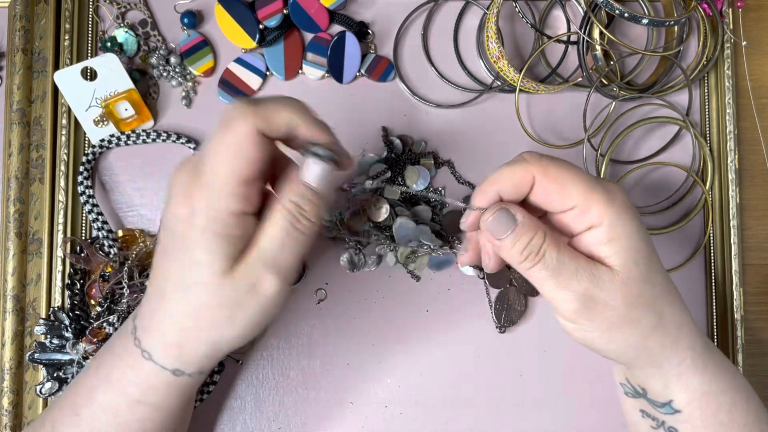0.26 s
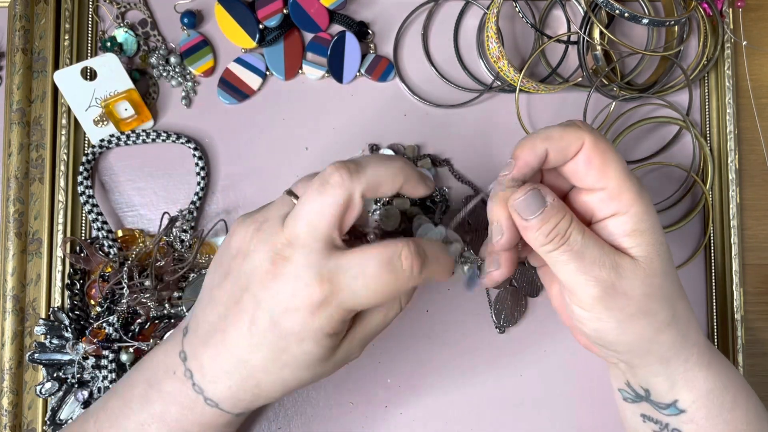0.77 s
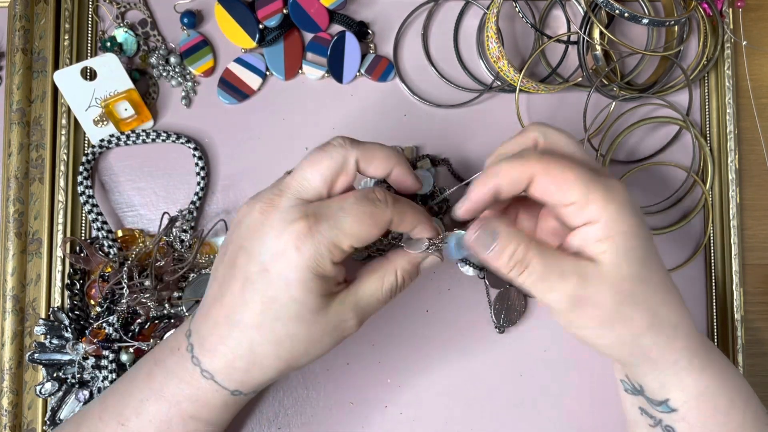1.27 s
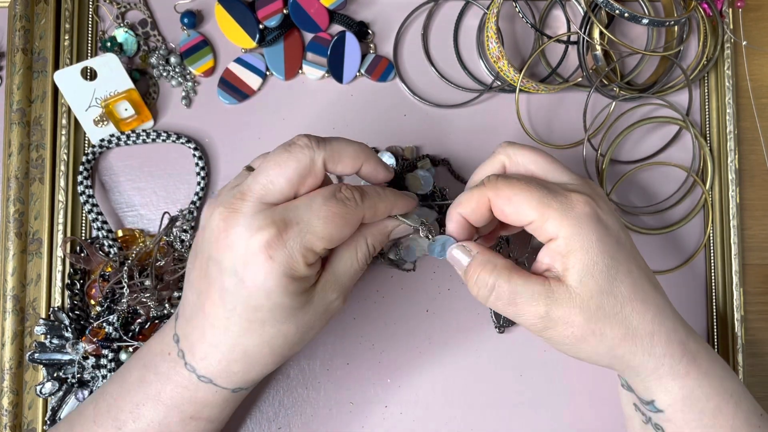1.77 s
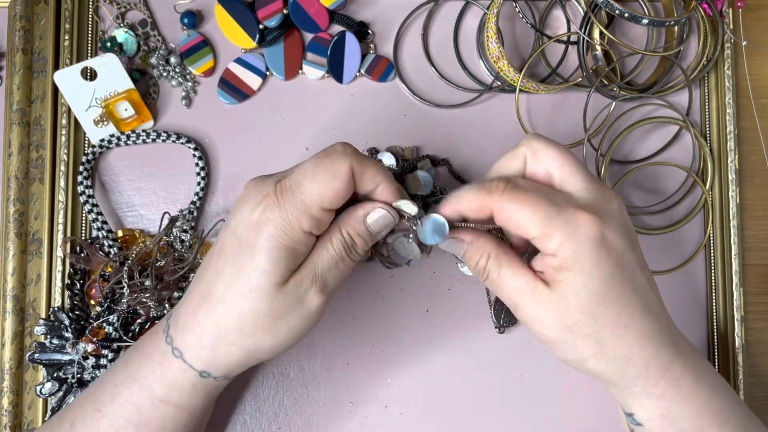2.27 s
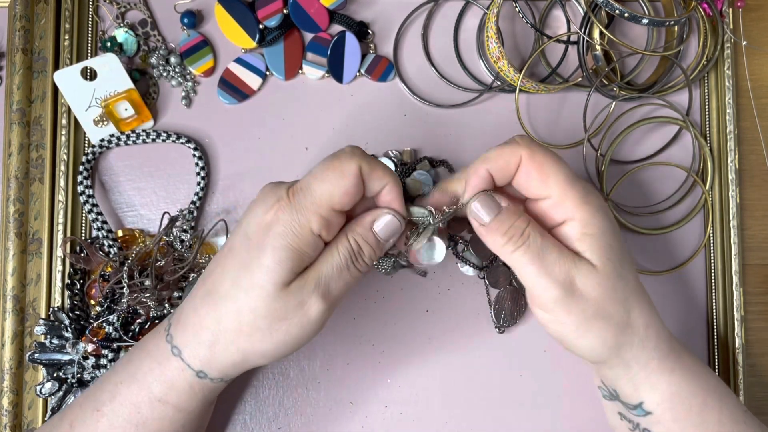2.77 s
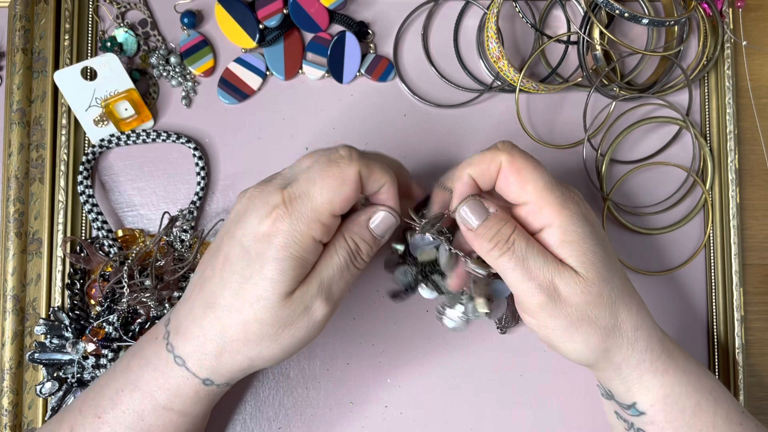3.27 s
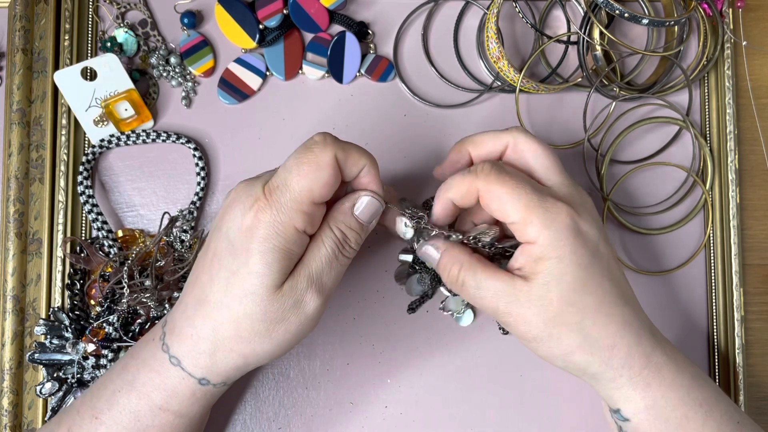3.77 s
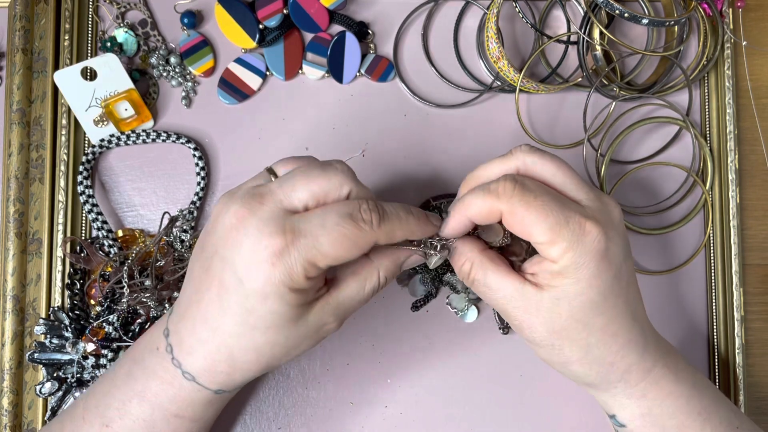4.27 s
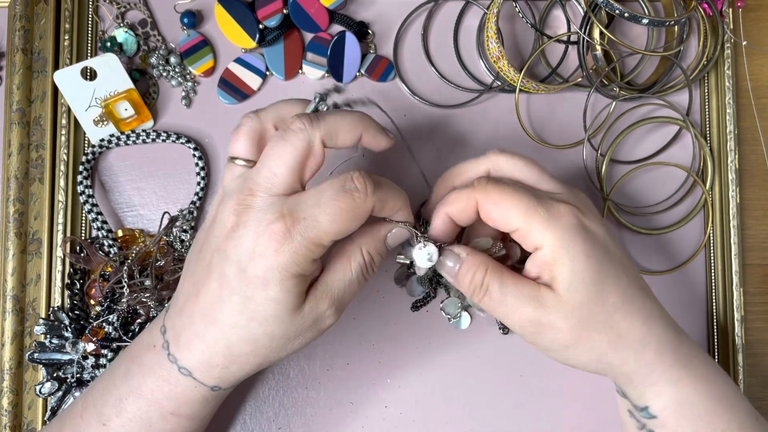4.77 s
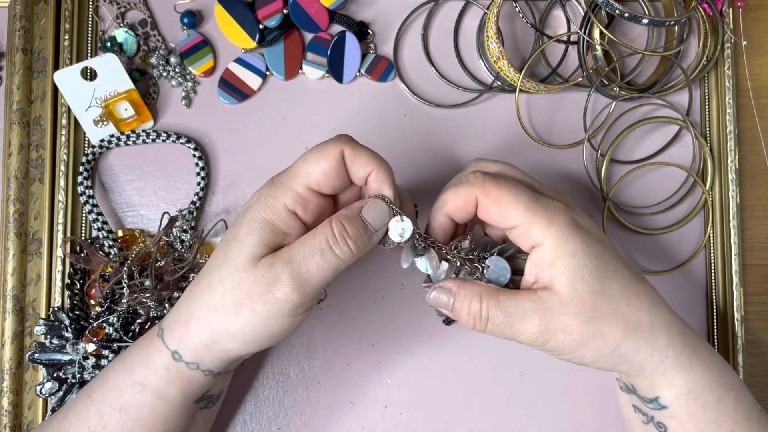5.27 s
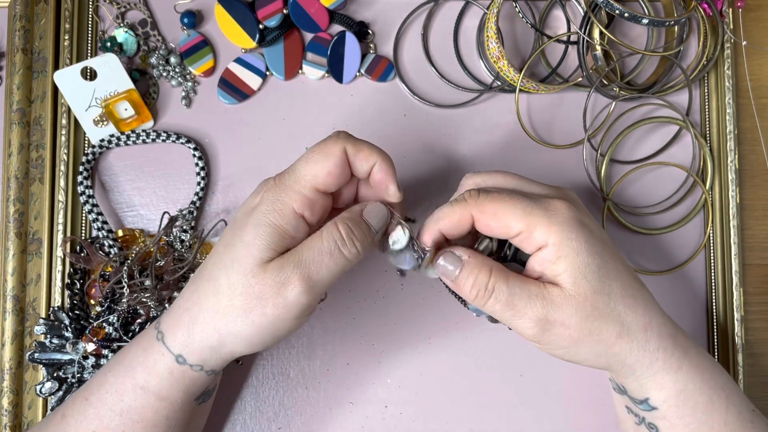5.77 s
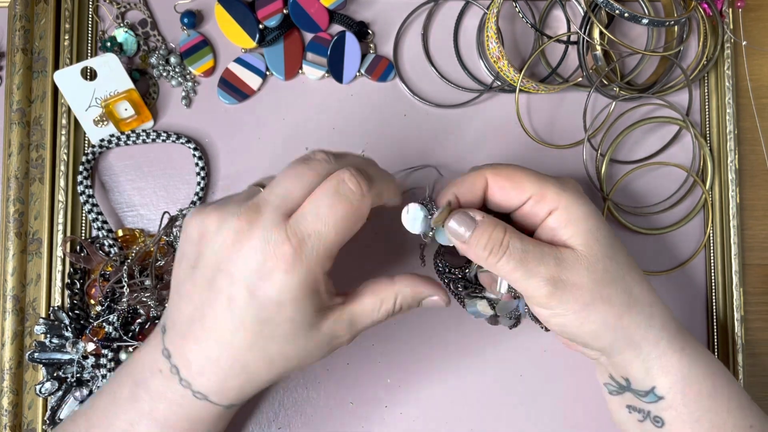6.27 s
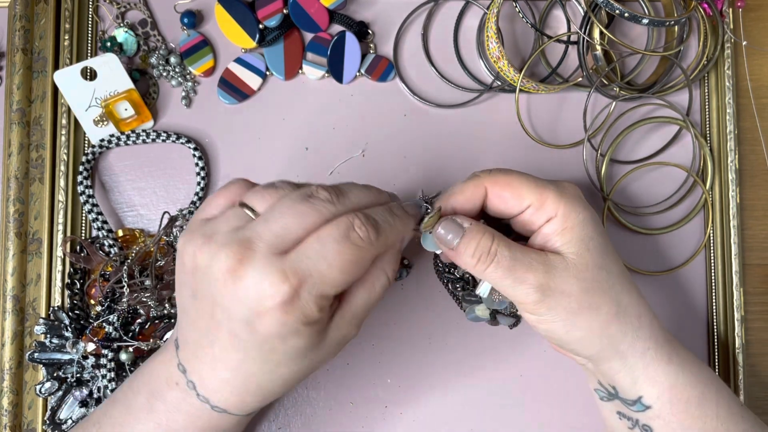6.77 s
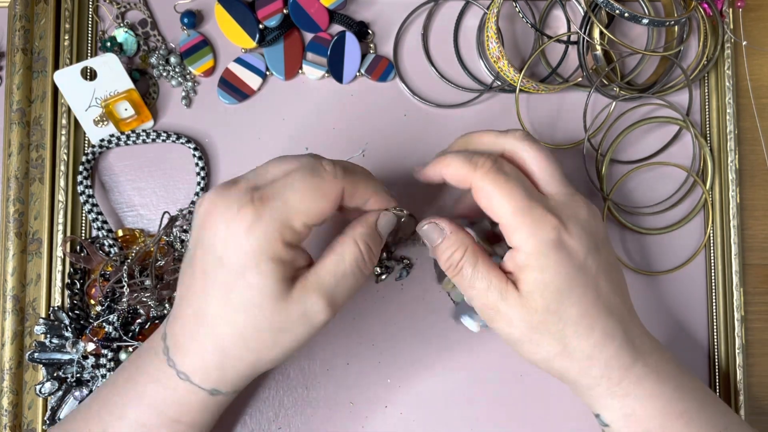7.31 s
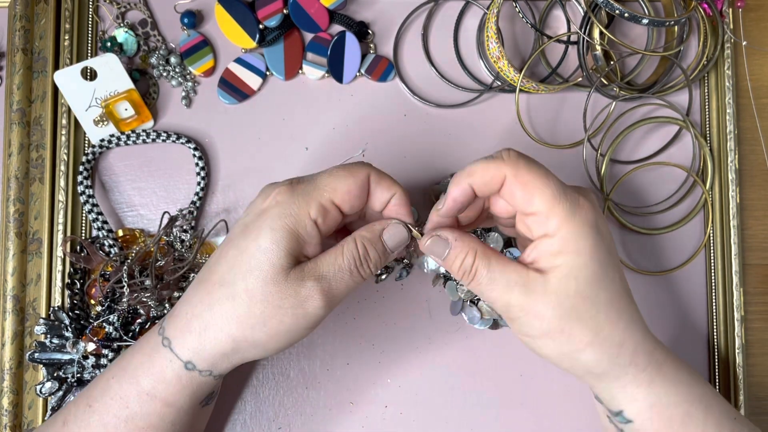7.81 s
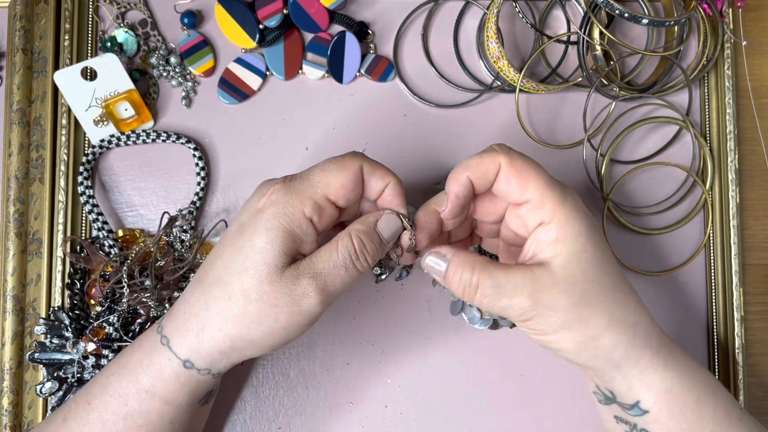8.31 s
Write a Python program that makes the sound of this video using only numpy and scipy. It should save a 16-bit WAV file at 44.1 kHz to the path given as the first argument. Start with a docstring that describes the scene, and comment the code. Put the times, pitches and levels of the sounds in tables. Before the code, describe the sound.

Hands untangle a necklace of shell discs and thin chains, close to the microphone in a small room. Light, bright clinks come irregularly among soft chain rattles, small taps and brief drags on a thin board. Late on, the bunch knocks against the board, then lands again with the loudest clatter, before the handling goes quiet. Distant traffic and engines rumble low outside throughout.

```python
"""A necklace of shell discs and thin chains clinks and rattles as hands untangle it over a board.
Discs and links strike each other, a loose charm rings, and the bunch knocks and drags on the board.
A small room echoes these sounds. Outside, traffic rumbles and two far engines drone, sinking in pitch.
It is all heard from close by, through the two microphone openings of a phone."""
import sys
import numpy as np
from scipy import signal
from scipy.fft import rfft, irfft, next_fast_len
from scipy.io import wavfile
from scipy.ndimage import uniform_filter1d, minimum_filter1d, map_coordinates

SR = 44100
rng = np.random.default_rng(int(sys.argv[2]) if len(sys.argv) > 2 else 0)


def put_to_file(sound):
    """Save the sound as 16-bit audio at rate SR, in the file named by the first command-line argument."""
    columns = np.atleast_2d(sound).T  # one column per channel
    safe = np.clip(columns, -1, 1)
    whole_steps = np.round(safe * 32767)
    wavfile.write(sys.argv[1], SR, whole_steps.astype(np.int16))


N = 376828

# Discs and links hit each other: start_s, strength_db, dull_vs_bright_db
CLINKS = [(0.0105, -36.5, -25), (0.0408, -32, -29.5), (0.0502, -28, -31), (0.135, -26, -31.5),
          (0.4196, -33.5, -7.5), (0.4959, -41, 5), (0.607, -47.5, -24), (0.709, -46, -25),
          (0.7762, -43, -19), (0.885, -37.5, -16), (0.985, -43.5, -20), (1.015, -43.5, -17),
          (1.093, -39, -14), (1.1431, -40.5, -14), (1.178, -38, -25), (1.1965, -39, -31), (1.269, -38, -11),
          (1.295, -37.5, -20.5), (1.337, -25.5, -36.5), (1.398, -39.5, -22), (1.4409, -33, -20),
          (1.658, -51.5, -15), (1.7395, -30.5, -23), (1.785, -41.5, -22), (2.0539, -41, -30),
          (2.212, -38, -17), (2.3851, -44, -30), (2.414, -46, -28), (2.5641, -26, -25), (2.5798, -25, -17),
          (2.6343, -32.5, -33), (2.7133, -32.5, -30), (2.8144, -32, -35.5), (2.9194, -36.5, -44),
          (3.283, -27, -31), (3.4213, -29.5, -19), (3.513, -32.5, -16.5), (3.5225, -29.5, -23.5),
          (3.6113, -46, -17), (3.6655, -39.5, -36), (3.755, -29.5, -31), (3.7638, -30, -17),
          (3.8472, -39.5, -25), (3.9849, -38.5, -22), (4.03, -33.5, -40), (4.195, -56, -25),
          (4.3609, -50, -30), (4.3844, -36, -35), (4.4631, -40, -32), (4.6539, -32.5, -34),
          (4.6892, -36, -31.5), (4.7755, -31, -27), (4.9026, -31.5, -37), (5.0071, -26, -20),
          (5.051, -26.5, -25), (5.1193, -34, -11.5), (5.2214, -35, -21), (5.354, -24.5, -29),
          (5.4578, -28, -28.5), (5.5974, -36.5, -15.5), (5.707, -34.5, -25), (5.757, -31, -20.5),
          (5.8522, -50.5, -18.5), (5.92, -39, -21), (6.012, -50.5, -18), (6.1785, -45, -23),
          (6.29, -51, -23), (6.3157, -36, -32), (6.471, -36, -10), (6.483, -31, 0.5), (6.5215, -24.5, 3),
          (6.5686, -32, -0.5), (6.624, -40, 4.5), (6.7, -49, -25), (6.7507, -50, -35), (6.9258, -43, -33),
          (7.1014, -35.5, -24.5), (7.116, -37, -19.5), (7.3102, -17.5, -25), (7.34, -20.5, -2),
          (7.3832, -14.5, -21.5), (7.4006, -22, -28), (7.4212, -10.5, -8.5), (7.4325, -15.5, -15),
          (7.4402, -16.5, -9), (7.5569, -28.5, -39), (7.5706, -39, -29), (7.681, -40, -20),
          (7.771, -55, -27)]
# The bright tick of a hit: frequency_hz, level_db
BRIGHT_TONE = [(800, -34.5), (2500, -37.5), (7000, -14), (8800, -3.5), (9700, -4.5), (10300, 0.5),
               (11500, -4), (13000, -22), (14000, -31), (15500, -32)]
# The dull body of a hit: frequency_hz, level_db
DULL_TONE = [(1200, -30), (2500, -12), (4200, -5), (5200, -2), (6100, -5), (7200, -3), (9000, -16)]
# Tugs at the chain: full_strength_s, rattle_db, build_up_s, hold_s, dull_vs_bright_db
TUGS = [(0.0, -43, .05, 0.18, -13), (0.409, -50.5, 0.16, 0.076, -5.5), (.65, -69, 0.114, 0.19, -14.5),
        (0.88, -52.5, .25, 0.043, -16), (1.108, -63, .15, 0.23, -9), (1.45, -51, .2, .0, -21),
        (1.55, -71.5, .1, .15, -22), (1.747, -52.5, 0.044, 0.0345, -15), (1.903, -63, 0.16, 0.055, -11),
        (2.035, -54.5, 0.153, 0, -24.5), (2.16, -61, 0.094, 0.023, -11), (2.318, -49, 0.095, .0, -9),
        (2.585, -44.5, 0.21, 0.24, -18), (2.932, -53.5, .1, .05, -17), (3.074, -39.5, 0.175, 0.3, -13),
        (3.5, -44.5, 0.45, 0.0014, -15), (3.743, -46, 0.16, 0.0423, -13), (3.963, -54, 0.18, .08, -18.5),
        (4.127, -63.5, .1, 0.031, -24), (4.396, -49.5, 0.055, 0.024, -18), (4.702, -57.5, 0.3, 0, -26),
        (4.998, -44.5, 0.954, 0.21, -19.5), (5.349, -41.5, 0.31, 0.14, -35.5),
        (5.713, -49, 0.22, 0.061, -15.5), (6.037, -59.5, .02, 0.01, -8), (6.326, -52, 0.035, 0.07, -10.5),
        (6.514, -38.5, 0.099, 0.035, -3.5), (7.083, -51.5, 0.39, 0.031, -14),
        (7.301, -30, 0.38, 0.074, -15.5), (7.414, -23, 0.24, 0.018, -19), (7.57, -62, .02, 0, -31),
        (7.691, -57, 0.053, 0, -20.5)]
# The bunch slides on the board: full_strength_s, level_db, build_up_s, hold_s
SLIDES = [(0.17, -59.5, .5, 0), (0.49, -58.5, 0.16, .0), (0.76, -59, 0.185, 0.023),
          (2.02, -61.5, 0.026, .0), (2.67, -59, .25, 0.024), (3.06, -51.5, 0.054, 0.086),
          (3.2, -48, 0.25, 0.043), (3.3, -60, .05, 0.14), (5.05, -61.5, .4, .2), (5.42, -52, 0.22, 0.043),
          (6.52, -39, 0.0557, 0.011), (7.29, -43, 0.041, 0.0444), (7.43, -33.5, 0.12, .0)]
# A loose charm rings: start_s, level_db, pitch_hz, fade_s (the time to fall by 60 dB)
CHARM_RINGS = [(0.151, -32.5, 7450, 0.074), (6.05, -54, 5300, 0.066), (6.32, -49, 5300, 0.076),
               (7.1, -36.5, 7040, 0.14), (7.4, -28.5, 9860, .05), (7.686, -45, 7250, 0.13)]
# Pieces land on the board: start_s, strength_db
KNOCKS = [(0.495, -27), (1.889, -40.5), (2.002, -34.5), (2.024, -35), (2.322, -32), (2.672, -28),
          (3.524, -34.5), (5.459, -28), (6.484, -16.5), (6.512, -14), (6.568, -14), (7.277, -15),
          (7.406, -12), (7.423, -26.5), (7.442, -17)]
# The notes at which the board rings: pitch_hz, width_hz, level_db
BOARD_NOTES = [(381.6, 93, -1.5), (668.4, 100, 1.5), (987, 70, -7.5), (1430, 66, -1.5), (1780, 23, -21.5),
               (2137, 130, -2.5), (2267, 640, -12)]
# How long the room's echo takes to fall by 60 dB: frequency_hz, fade_s
ECHO_FADE = [(300, 0.1441), (3000, 0.27), (11000, 0.01)]
# How strong the room's echo is: frequency_hz, level_db
ECHO_TONE = [(300, -4), (1300, -2.5), (3000, -8), (6500, -6.5), (8500, -20.5)]
# Traffic swells and eases: time_s, rumble_db, wash_db
TRAFFIC_LEVELS = [(0, -49.5, -59.5), (1.2, -45.5, -59), (2.3, -49, -59.5), (3.6, -46, -58),
                  (5.2, -50.5, -60), (6.5, -51, -59.5), (8.54, -54, -64.5)]
# The deep rumble of traffic: frequency_hz, level_db
RUMBLE_TONE = [(12, -39.5), (20, -4.5), (32, -0.5), (53, 2), (81, -2.5), (123, -5.5), (187, -25.5),
               (220, -21.5), (290, -58.5), (480, -120)]
# The soft wash of traffic above the rumble: frequency_hz, level_db
WASH_TONE = [(90, -42.5), (150, -7.5), (250, -14.5), (490, -17.5), (620, -25), (1300, -30), (2400, -41),
             (3600, -54), (8000, -53), (10300, -57), (11500, -65), (12600, -81)]
# Two far engines slow down: time_s, firing_rate_hz, level_db, lift_per_multiple_db
FIRST_ENGINE = [(0, 92.83, -53, -0.5), (2, 91.2, -57, 1), (3, 90.64, -59.5, 1), (5, 87, -76, 1.5),
                (6.2, 85.13, -68, 3.5), (7.5, 83.5, -68.5, 3), (8.54, 80.9, -61, 2)]
SECOND_ENGINE = [(0, 77.89, -67, 11), (2, 76.67, -59.5, 0.5), (3.5, 75.75, -58, 3), (4.8, 74.25, -46.5, -9),
                 (6, 71.53, -53.5, -1), (8.54, 68.2, -55, 2)]
# The tones in each engine's drone: multiple_of_firing_rate, level_db
FIRST_ENGINE_TONES = [(.5, 0), (1, 2.5), (2, -4.5), (3, -10), (4, -19.5), (5, -20), (6, -23)]
SECOND_ENGINE_TONES = [(.5, 0.92), (1, 0.5), (2, -0.5)]
# How far a wave at the left microphone is ahead of the right: frequency_hz, lead_radians
LEFT_LEAD = [(150, 0), (1200, -.4), (2000, .2), (5300, .9), (6800, .1), (7600, .9), (8700, 0),
             (10250, -3.1), (11800, -6.2), (12600, -6.6), (13500, -9.3), (14300, -9.5), (14900, -12.3)]
# How much louder the left microphone is than the right: frequency_hz, left_minus_right_db
LEFT_BOOST = [(100, .6), (500, 2.8), (2000, 2), (5000, 4), (6000, 2), (7100, 4.5), (8000, .3)]


def disc_clinks():
    """Discs and links hit and bounce, making a bright tick with a duller body."""
    bright, dull = np.zeros((2, N + SR))
    for start_s, strength_db, dull_db in CLINKS:
        hit = amp(strength_db) * bounces(hold_s=0.00033, fade_s=0.02584)
        add_at(bright, start_s, hit)
        add_at(dull, start_s, amp(dull_db) * hit)
    return shape_hits(bright, BRIGHT_TONE) + shape_hits(dull, DULL_TONE)


def bounces(hold_s, fade_s):
    """One hit is a run of tiny, uneven bounces that holds briefly, then falls 60 dB in fade_s."""
    t = np.arange(SR // 12) / SR
    bounce_db = 2.8 * rng.standard_normal(len(t) // 32 + 1)
    uneven = amp(np.repeat(bounce_db, 32)[:len(t)])  # a new strength every 0.7 ms
    outline = amp(-60 * np.maximum(t - hold_s, 0) / fade_s) * (1 - np.exp(-t / .0004))
    burst = uneven * rng.standard_normal(len(t)) * outline
    return unit(burst) * np.sqrt(np.mean(outline ** 2))  # same energy however the bounces fall


def chain_rattle():
    """Tugged links rub and tick in clumps; the sliding bunch scrapes and shakes the board."""
    bright_tugs = [row[:-1] for row in TUGS]
    dull_tugs = [(time_s, db + dull_db, *timing) for time_s, db, *timing, dull_db in TUGS]
    bright_level = hand_moves(bright_tugs, rest_db=-77, gone_db=-91, settle_s=0.2)
    dull_level = hand_moves(dull_tugs, rest_db=-96, gone_db=-110.5, settle_s=0.2)
    slide_level = hand_moves(SLIDES, rest_db=-71.5, gone_db=-71.5, settle_s=0.12)
    scrape_level = amp(-12.5) * slide_level
    clumps = amp(2.73 * wobble(45) + 2.8 * wobble(150))
    ticks = clumps * tiny_hits(per_second=2200, spread_db=0.5)
    bright = bright_level * unit(shape_hits(ticks, BRIGHT_TONE))
    dull = np.hypot(dull_level, scrape_level) * unit(shape_hits(ticks, DULL_TONE))
    drag_hits = np.sqrt(clumps) * tiny_hits(per_second=2500, spread_db=4.0)
    return bright + dull + slide_level * unit(board(drag_hits))


def hand_moves(moves, rest_db, gone_db, settle_s):
    """Loudness over time: each move builds from rest_db, holds, and is down to gone_db after settle_s."""
    full_s, level_db, build_s, hold_s = np.transpose(moves)[:, :, None]
    t = np.arange(0, N / SR, .001)
    drop_before_db = (level_db - rest_db) * (full_s - t) / build_s.clip(.01)
    drop_after_db = (level_db - gone_db) * (t - full_s - hold_s.clip(0)) / settle_s
    levels = amp(level_db - np.maximum(drop_before_db, drop_after_db).clip(0))
    together = np.linalg.norm(levels, axis=0)  # overlapping moves add their power
    return np.interp(np.arange(N) / SR, t, together)


def tiny_hits(per_second, spread_db):
    """Links touch at random moments, some harder than others."""
    chance, direction = rng.random((2, N))
    strength = amp(spread_db * rng.standard_normal(N))
    return (chance < per_second / SR) * strength * np.sign(direction - .5)


def charm_rings():
    """A swinging charm rings for a moment on one slightly rough note."""
    out = np.zeros(N + SR)
    t = np.arange(SR // 5) / SR
    for start_s, level_db, pitch_hz, fade_s in CHARM_RINGS:
        roughness = .22 * np.cumsum(rng.standard_normal(len(t)))
        outline = amp(level_db - 60 * t / fade_s) * (1 - np.exp(-t / 0.00077))
        add_at(out, start_s, outline * np.sin(2 * np.pi * pitch_hz * t + roughness))
    return out[:N]


def board_knocks():
    """A piece lands and bounces, sending a short scatter of hits into the board."""
    hits = np.zeros(N + SR)
    for start_s, strength_db in KNOCKS:
        add_at(hits, start_s, amp(strength_db) * bounces(hold_s=0.0041, fade_s=0.037))
    return board(hits[:N])


def board(hits):
    """The thin board answers each hit with a few ringing notes over a broad thud."""
    def response(hz):
        ring = sum((-1) ** k * amp(db) * 1j * hz * width / (pitch ** 2 - hz ** 2 + 1j * hz * width)
                   for k, (pitch, width, db) in enumerate(BOARD_NOTES))
        thud = (1j * hz / (250 + 1j * hz)) ** 2 / (1 + 1j * hz / 1500)  # about 250 to 1500 Hz
        return 0.81 * ring + 0.448 * thud
    return filtered(hits, response)


def room_echo(sound):
    """The walls send sound back; the hands keep moving, so each quarter second gets its own echo."""
    out = np.zeros((2, N + SR))
    step, delay = SR // 4, 60  # in samples
    for start in range(0, N, step):
        hz, t, noise = signal.stft(rng.standard_normal((2, SR // 3)), SR, nperseg=256)
        fade = amp(-60 * t / look_up(ECHO_FADE, hz)[:, None])
        gain = amp(look_up(ECHO_TONE, hz)) / np.sqrt(np.mean(fade ** 2, axis=1) * SR / 3)
        tail = signal.istft(noise * fade * gain[:, None], SR, nperseg=256)[1]
        echo = signal.fftconvolve(sound[None, start:start + step], tail, axes=1)
        out[:, start + delay:start + delay + echo.shape[1]] += echo
    return out[:, :N]


def traffic():
    """Traffic outside: a throbbing rumble in the middle, a wide wash above it and two far engines."""
    rumble_db, wash_db = over_time(TRAFFIC_LEVELS)
    rumble = unit(filtered(rng.standard_normal(N), lambda hz: amp(look_up(RUMBLE_TONE, hz))))
    middle, side = filtered(rng.standard_normal((2, N)), lambda hz: amp(look_up(WASH_TONE, hz)))
    # Long, low waves reach both microphones alike.
    side = filtered(side, lambda hz: 0.91 * hz ** 2 / (hz ** 2 + 160 ** 2))
    wash = unit(np.array([middle + side, middle - side]))
    drone = far_engine(FIRST_ENGINE, FIRST_ENGINE_TONES) + far_engine(SECOND_ENGINE, SECOND_ENGINE_TONES)
    rumble *= amp(rumble_db + 1.5 * wobble(3.4))
    wash *= amp(wash_db + 1.1 * wobble(5.9))
    return rumble + wash + drone


def far_engine(course, tones):
    """An engine hums at multiples of its firing rate; the trip through the air makes each tone waver."""
    firing_hz, level_db, lift_db = over_time(course)
    angle = 2 * np.pi * np.cumsum(firing_hz) / SR
    drone = np.zeros(N)
    for multiple, tone_db in tones:
        level = amp(level_db + tone_db + lift_db * (multiple - 1) + 2.9 * wobble(4))
        drone += level * np.sin(multiple * angle + 0.5 * wobble(3))
    return drone


def amp(db):
    """Turn decibels into a number to multiply a sound by."""
    return 10 ** (np.asarray(db) / 20)


def unit(sound):
    """Scale a sound to an average power of one."""
    return sound / np.sqrt(np.mean(sound ** 2) + 1e-20)


def add_at(track, start_s, sound):
    """Mix a short sound into a track."""
    track[round(start_s * SR):][:len(sound)] += sound


def look_up(table, hz):
    """Read between the rows of a frequency table, with frequency spaced by octaves."""
    row_hz, values = np.transpose(table)
    return np.interp(np.log(hz + 1), np.log(row_hz + 1), values)


def over_time(table):
    """Give each column after the time one value per sample."""
    time_s, *columns = np.transpose(table)
    return [np.interp(np.arange(N) / SR, time_s, column) for column in columns]


def wobble(per_second):
    """A smooth curve through this many random points a second."""
    points = rng.standard_normal(int(N * per_second / SR) + 4)
    return map_coordinates(points, [np.arange(N) * per_second / SR])


def filtered(sound, response):
    """Change the strength and timing of each frequency by response(hz)."""
    size = next_fast_len(N + SR // 2)
    hz = np.fft.rfftfreq(size, 1 / SR)
    return irfft(rfft(sound, size) * response(hz), size)[..., :N]


def shape_hits(hits, tone):
    """Turn each hit into a short click with the given tone."""
    log_spectrum = np.log(amp(look_up(tone, np.fft.rfftfreq(2048, 1 / SR))))
    # Fold the early half onto the late half, so nothing sounds before the hit (minimum phase).
    folded = irfft(log_spectrum)
    folded[1:1024] *= 2
    folded[1025:] = 0
    click = irfft(np.exp(rfft(folded)))
    return signal.fftconvolve(hits, click / np.linalg.norm(click))[:N]


def limiter(sound, ceiling):
    """The volume drops just ahead of a loud peak and comes back within a few milliseconds."""
    gain = np.minimum(1, ceiling / (np.abs(sound).max(axis=0) + 1e-9))
    return sound * uniform_filter1d(minimum_filter1d(gain, size=300), size=150)


def scene():
    """The necklace on the board, its echo in the room and the traffic outside."""
    necklace = chain_rattle() + disc_clinks() + charm_rings() + board_knocks()
    return necklace + room_echo(necklace) + traffic()


def record(dry):
    """The phone hears left and right a little apart, holds down peaks and cuts the highest treble."""
    def microphones(hz):
        sides = np.array([[.5], [-.5]])  # left, right
        balance = amp(sides * look_up(LEFT_BOOST, hz))
        timing = np.exp(1j * sides * look_up(LEFT_LEAD, hz))
        whistle = amp(5 * np.exp(-((hz - 10250) / 600) ** 2))  # both openings ring near 10250 Hz
        return balance * timing * whistle
    limited = limiter(filtered(dry, microphones), ceiling=.46)
    treble_cut_hz = 15850
    return filtered(limited, lambda hz: 1 / (1 + (hz / treble_cut_hz) ** 150))


dry = scene()
out = record(dry)
put_to_file(out)
```